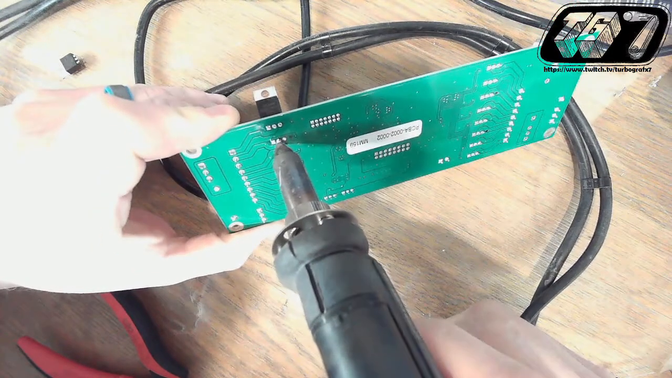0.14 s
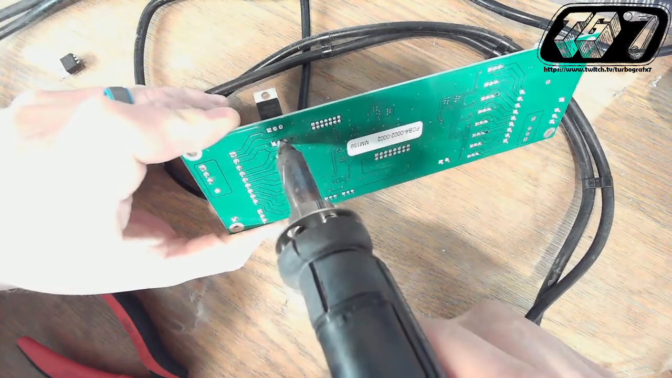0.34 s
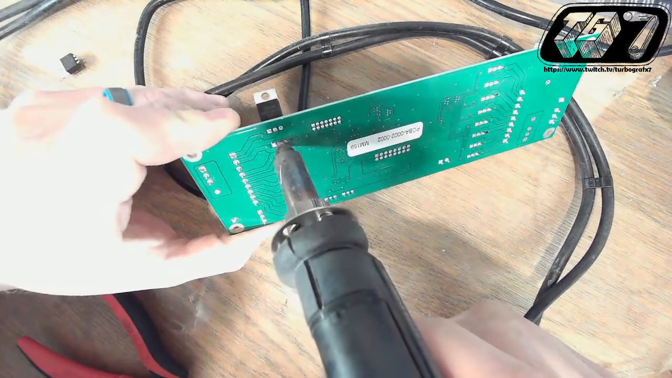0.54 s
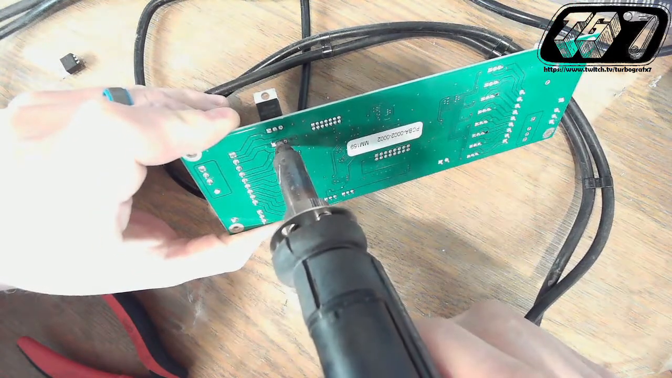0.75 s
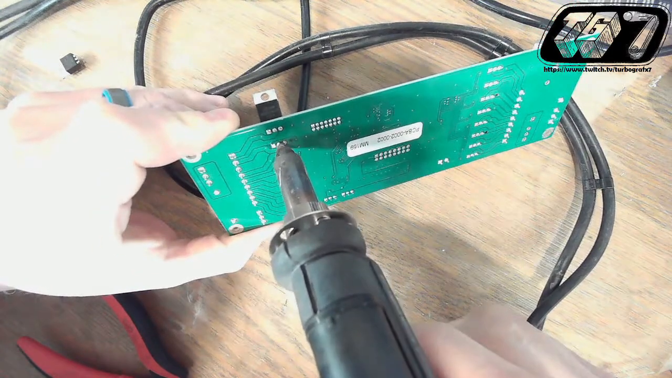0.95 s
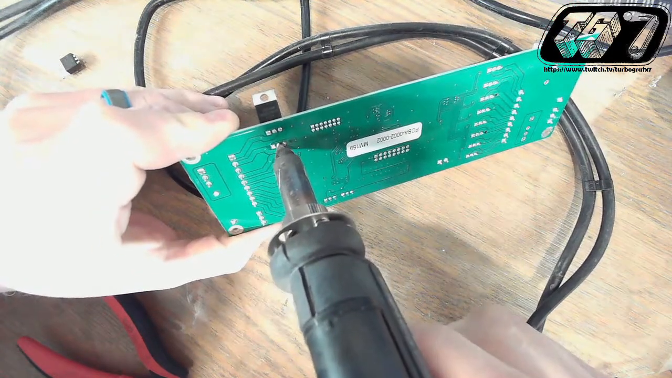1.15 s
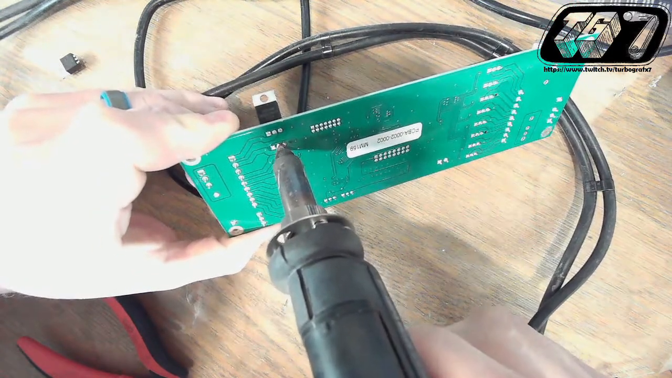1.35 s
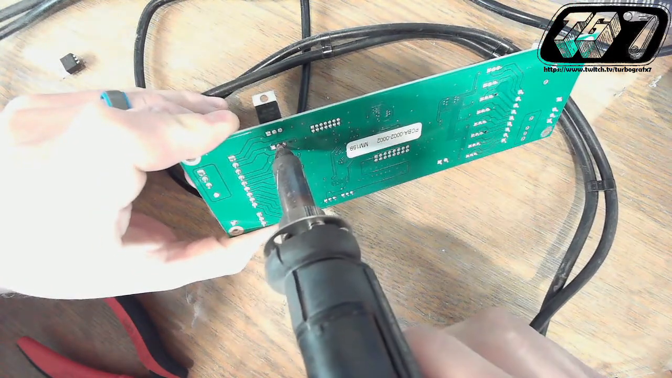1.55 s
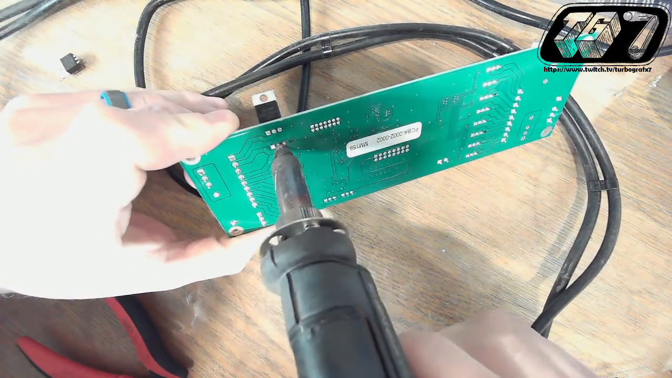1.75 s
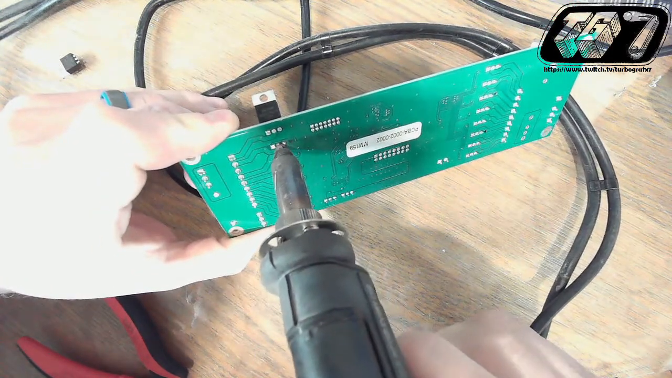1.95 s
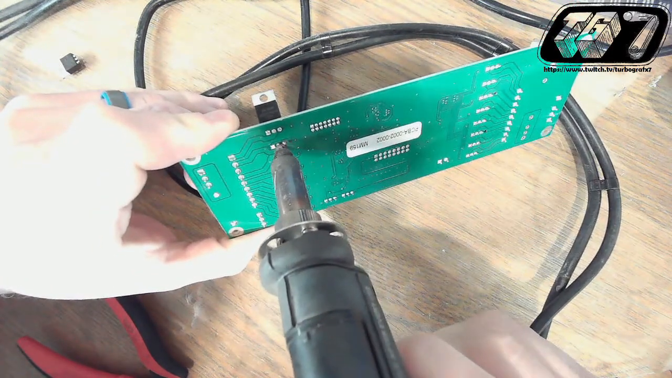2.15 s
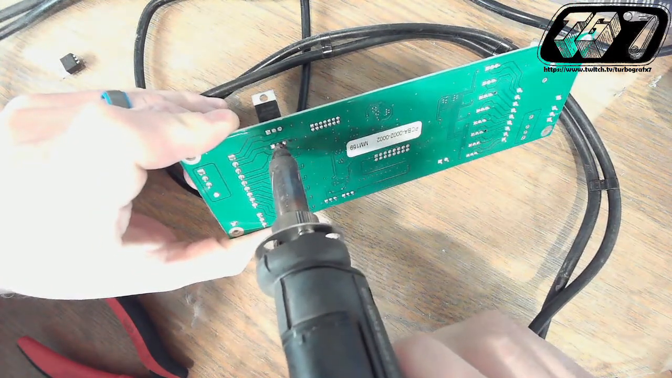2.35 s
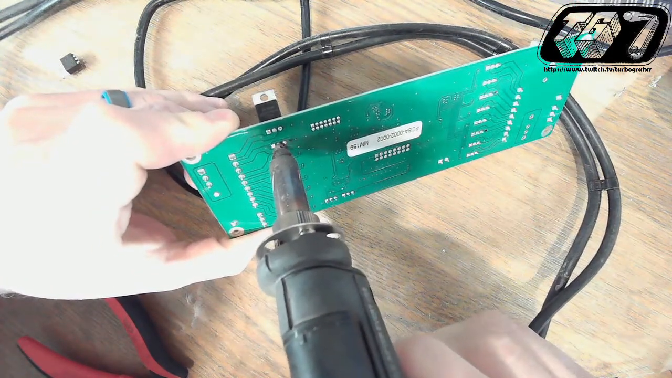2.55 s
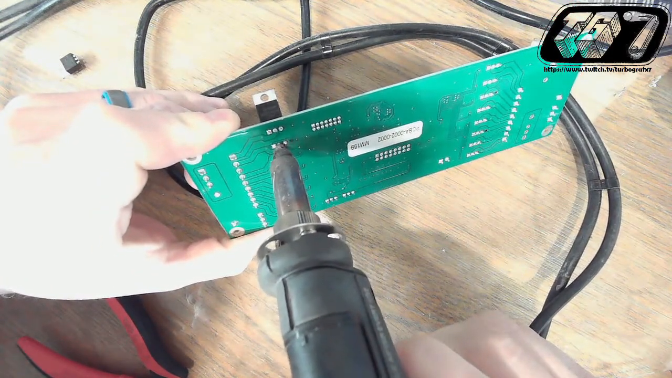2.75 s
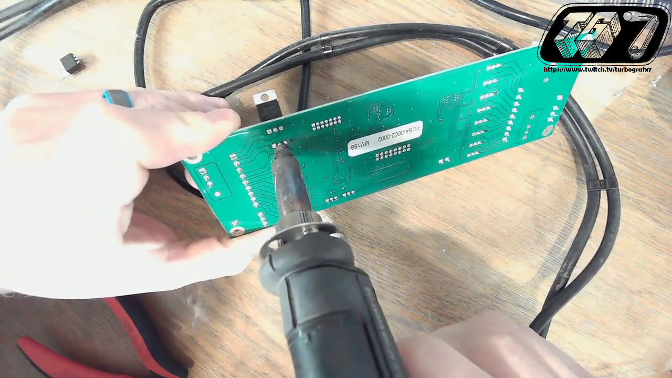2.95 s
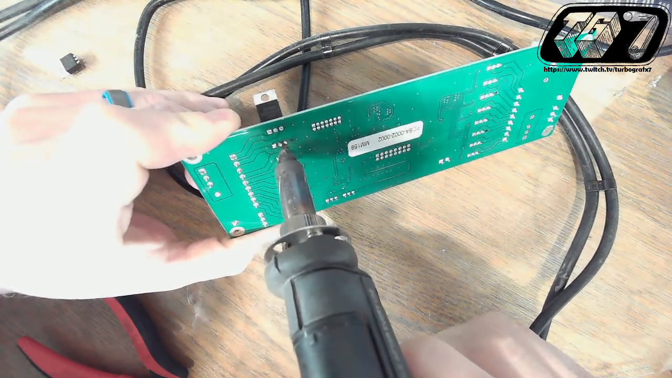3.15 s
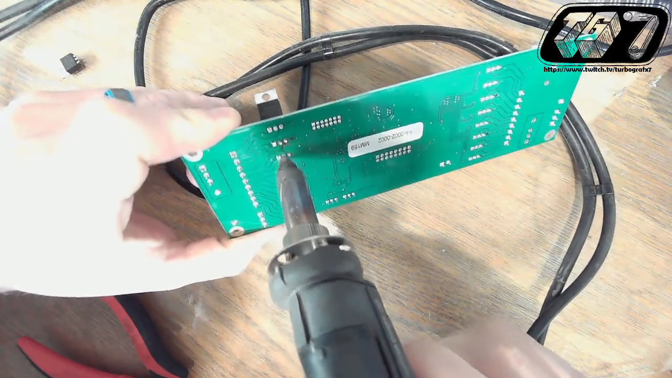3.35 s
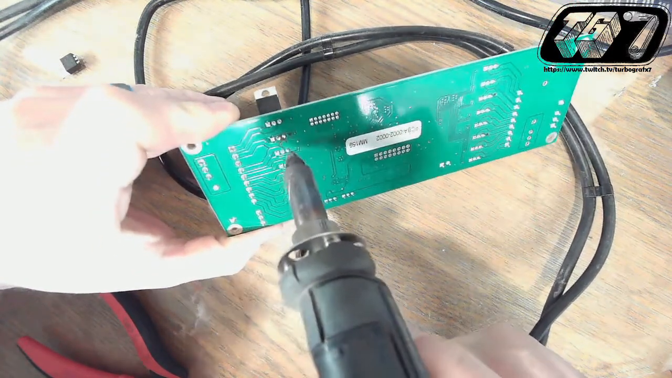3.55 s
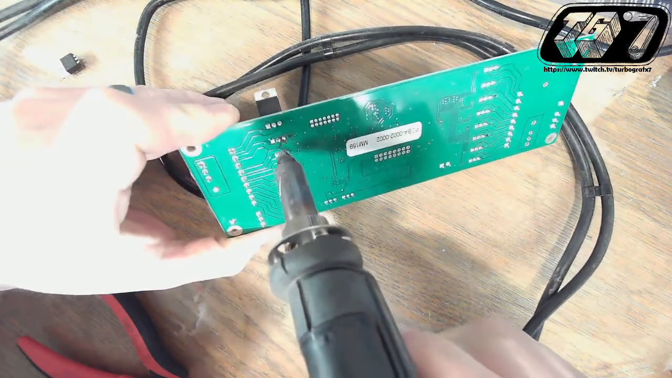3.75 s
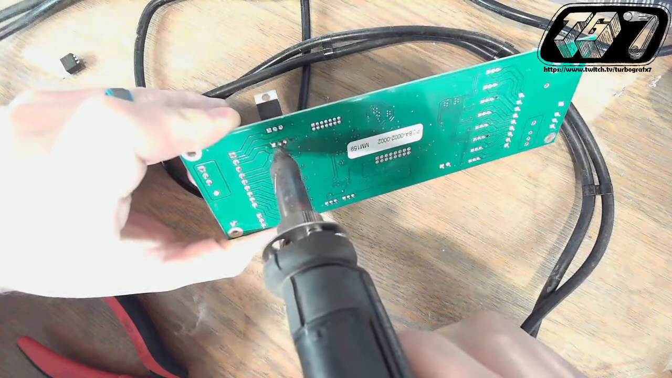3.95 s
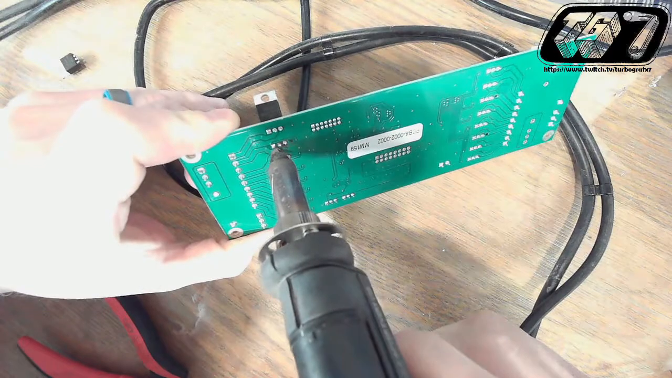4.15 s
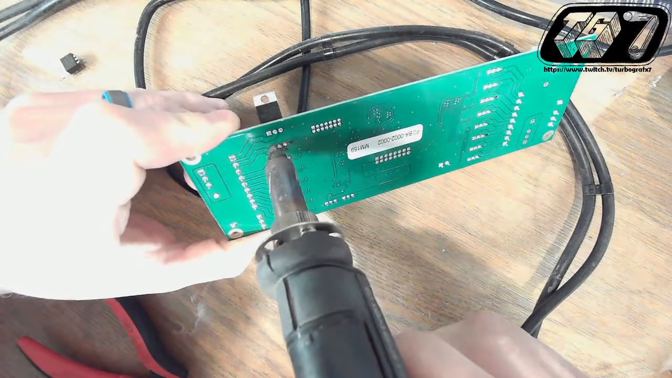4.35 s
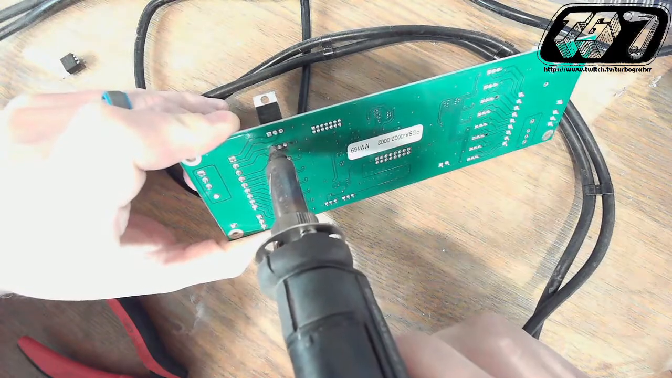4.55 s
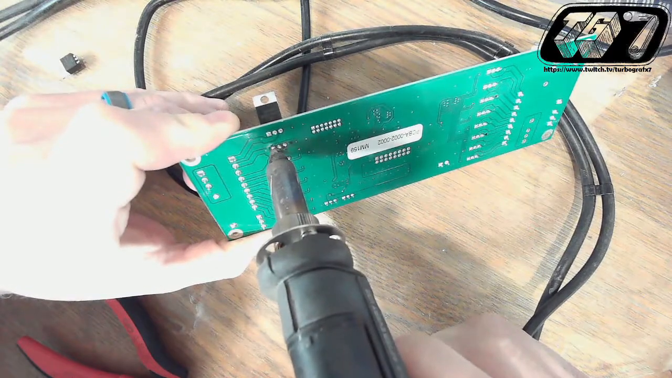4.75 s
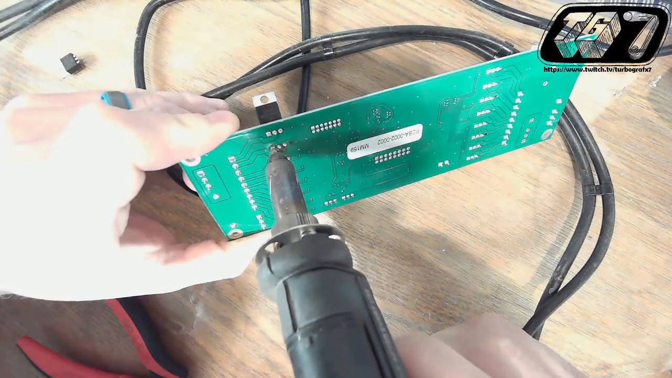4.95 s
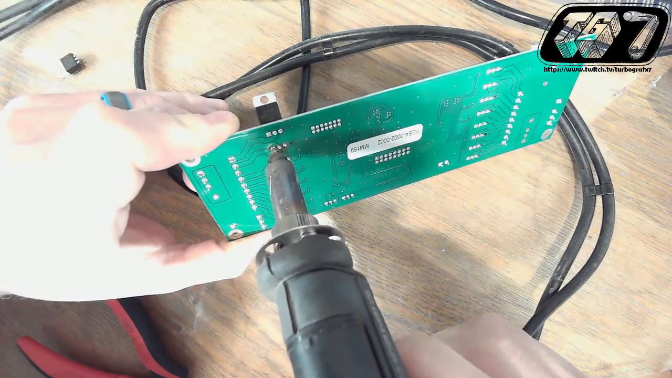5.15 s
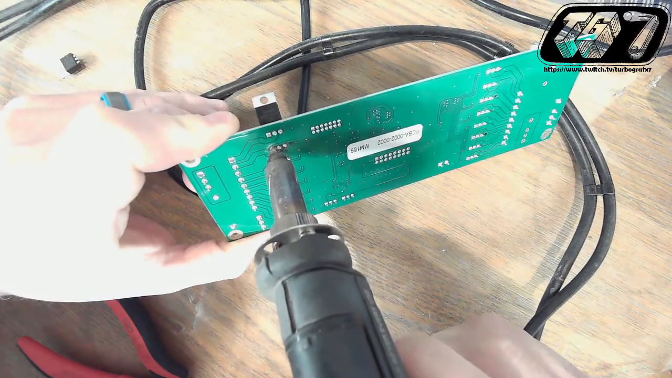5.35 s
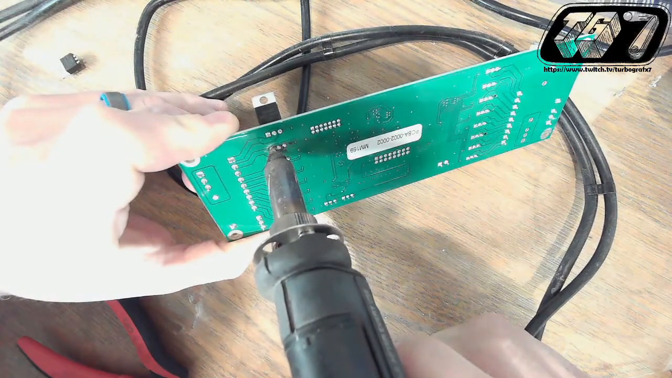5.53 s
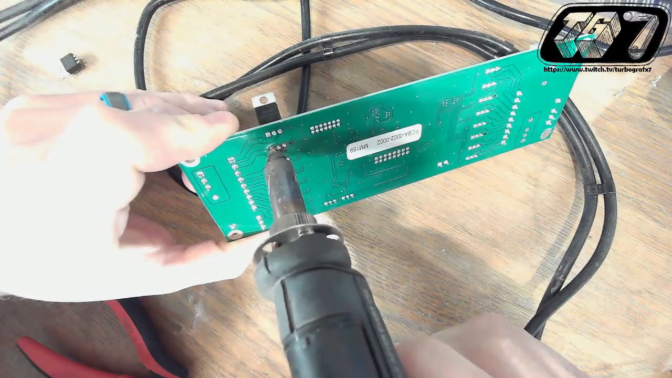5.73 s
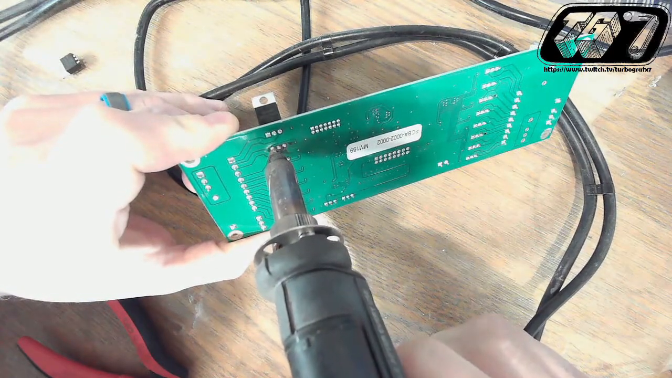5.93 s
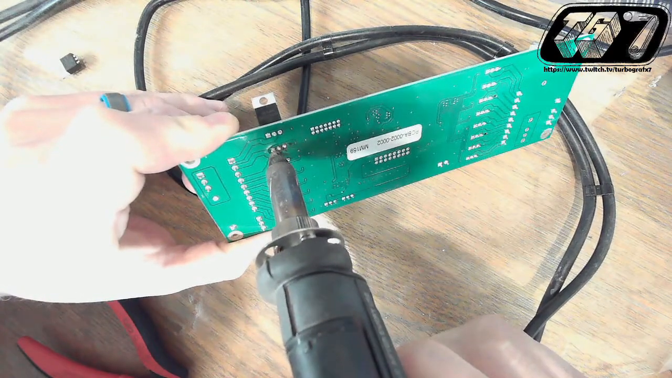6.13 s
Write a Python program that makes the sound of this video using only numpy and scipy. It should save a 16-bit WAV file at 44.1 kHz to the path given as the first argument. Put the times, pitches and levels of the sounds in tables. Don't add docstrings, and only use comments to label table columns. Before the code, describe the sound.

A desoldering gun's trigger snaps, its small pump buzzes for over a second, snaps off, then after a quiet gap buzzes again.

```python
import sys
import numpy as np
from scipy import signal
from scipy.fft import rfft, irfft, next_fast_len
from scipy.io import wavfile
from scipy.ndimage import uniform_filter1d

SR = 44100
rng = np.random.default_rng(int(sys.argv[2]) if len(sys.argv) > 2 else 0)


def level_to_linear(level):
    exponent = np.asarray(level, float) / 20
    return 10 ** exponent


def bounce(signal):
    frames = np.transpose(np.atleast_2d(signal))
    limited = np.clip(frames, -1, 1)
    pcm = np.round(limited * 32767).astype(np.int16)
    wavfile.write(sys.argv[1], SR, pcm)


N = 277389
SIZE = next_fast_len(N)
BINS = np.fft.rfftfreq(SIZE, 1 / SR)


def evened(x):
    return x / np.sqrt(np.mean(x ** 2) + 1e-20)


def read(points, hz):
    f, value = np.transpose(points)
    return np.interp(np.log(hz + 1), np.log(f + 1), value)


def resonate(x, hz, width):
    return signal.lfilter(*signal.iirpeak(hz, hz / width, SR), x)


def wander(hz):
    pole = np.exp(-2 * np.pi * hz * 256 / SR)
    slow = signal.lfilter([1], [1, -pole], rng.standard_normal(N // 256 + 2))
    return np.interp(np.arange(N) / 256, np.arange(len(slow)), evened(slow))


def coloured(x, gain):
    return irfft(rfft(x, SIZE) * gain, SIZE)[..., :N]


def stereo(x, same, lean):
    scatter = rfft(rng.standard_normal(200) * np.exp(-np.arange(200) / 40), SIZE)
    turn = 0.58 * np.arccos(np.clip(read(same, BINS), 0, 1)) * np.cos(np.angle(scatter))
    half = level_to_linear(read(lean, BINS) / 2) * np.exp(1j * turn)
    return coloured(x, np.array([half, 1 / half]))


# frequency in Hz, likeness from 0 to 1.
PUMP_LIKENESS = [(60, 1), (150, 0.94), (380, 1), (950, 0.95), (2380, 0.72), (5980, 0.1), (15000, 0.99)]
# frequency in Hz, left minus right in dB.
PUMP_BALANCE = [(60, -1), (150, -2), (380, 0.5), (950, -2.5), (2380, -2), (5980, -1), (15000, 10.5)]


def pump():
    speed, share, coasting = shaft_motion()
    turns = np.cumsum(speed * (1 + .0006 * wander(hz=15))) / SR
    turns = turns + sum(slip * (np.arange(N) > rest * SR) for rest, off, full, slip in RUNS)
    thrum_gain, rumble_gain, air_gain = (effort(layer, share, coasting) for layer in (THRUM, SHUDDER, SUCTION))
    thrum, whirr = shaft_tones(turns)
    body = thrum_gain * thrum + rumble_gain * (level_to_linear(2.5) * whirr + level_to_linear(-1.5) * housing_rumble(turns))
    body = body + bench_drone(thrum_gain * np.maximum(share ** 1.5, coasting)) + jolts()
    knock, clack = valves(turns)
    high = air_gain * (level_to_linear(-4.5) * knock + level_to_linear(-9.0) * clack + nozzle_air(turns))
    high = coloured(high, 1 / (1 + (BINS / 14800) ** 8) * (BINS > 600))
    return stereo(body + high, PUMP_LIKENESS, PUMP_BALANCE)


# shaft at rest until in seconds, power off in seconds, full speed in turns per second,
# crank slip in turns.
RUNS = [
    (2.0, 3.345, 51.24, .26),
    (5.5, 7.0, 51.18, .12),
]
CONTACT_S, SPIN_UP_S, GRIP_S = .046, .257, .02
COAST_PER_S2, STALL = 306, .3


def shaft_motion():
    t = np.arange(N) / SR
    speed, share, coasting = np.full(N, 14.), np.zeros(N), np.zeros(N)
    for rest, off, full, slip in RUNS:
        climb = np.sin(np.pi / 2 * np.clip((t - rest) / SPIN_UP_S, 0, 1))
        part = climb - np.maximum(t - off, 0) * COAST_PER_S2 / full
        on = (t > rest + CONTACT_S) & (part > np.minimum(STALL, climb / 2))
        bite = np.clip((t - rest - CONTACT_S) / GRIP_S, 0, 1)
        speed = np.where(on, part * full, speed)
        share = np.where(on, part * bite, share)
        coasting = coasting + on * (t > off)
    return uniform_filter1d(speed, size=200), share, coasting


# full-speed level in dB,
# power of speed while driven, power of speed while coasting.
THRUM = (-38, 1.17, 3)
SHUDDER = (-40, 1, 2.8)
SUCTION = (-45, 1.6, 4.1)


def effort(layer, share, coasting):
    full_db, driven, loose = layer
    return uniform_filter1d(level_to_linear(full_db) * share ** (driven + (loose - driven) * coasting), size=200)


# multiple of the shaft speed, level in dB.
SHAFT = [(1, -0.5), (2, -8.5), (3, -10), (4, 0.5), (5, -17.5), (6, -18), (7, -18), (8, -19.5), (9, -23.5),
         (10, -9), (11, -8.5), (12, -28), (13, -6.5), (14, -9.5), (15, -32.5), (16, -25), (17, -8),
         (18, -19), (19, -11), (20, -16.5), (21, -18.5), (22, -18.5), (23, -18.5), (24, -40), (25, -27),
         (26, -17.5)]
# frequency in Hz, density in dB per Hz.
RUMBLE = [(28, -50.5), (48, -20.5), (80, 0), (130, -5.5), (180, 1.5), (240, -9), (300, -6), (430, -18.5),
          (520, -12), (680, -7), (800, -15), (980, -10.5), (1440, -21.5), (3500, -63.5)]


def shaft_tones(turns):
    tones = []
    for k, db in SHAFT:
        tones.append(level_to_linear(db + 0.27 * wander(hz=19)) * np.cos(2 * np.pi * (round(k) * turns + rng.random())))
    drive = sum(tone / level_to_linear(read(RUMBLE, k * 53.8)) for (k, db), tone in zip(SHAFT[4:], tones[4:]))
    return evened(sum(tones[:4])), evened(coloured(drive, level_to_linear(read(RUMBLE, BINS))))


def housing_rumble(turns):
    beat = 1 + .5 * np.cos(4 * np.pi * turns)
    return evened(coloured(beat * rng.standard_normal(N), level_to_linear(read(RUMBLE, BINS))))


# frequency in Hz, level in dB, t60 in seconds.
BENCH = [(54.5, -7, 0.34), (97, -4.5, 0.2), (140.4, -6, 0.36), (172.9, -2, 1.3), (187.7, -2.5, 1.2),
         (212.4, -4, .45), (263, -8, 1.1), (282.3, -2, 0.59), (313, -18.5, 0.82)]


def bench_drone(force):
    low = BINS / (BINS + 60) / (1 + (BINS / 330) ** 4)
    shake = force * level_to_linear(-9.5) * coloured(rng.standard_normal(N), low)
    return sum(level_to_linear(db) * resonate(shake, hz, 2.0 / t60) * np.sqrt(t60 * SR / 7) for hz, db, t60 in BENCH)


# start in seconds, bench peak in dB, housing peak in dB.
JOLTS = [
    (2.059, -62, -43.5),
    (2.0785, -65, -33),
    (2.097, -68, -42),
    (2.109, -62.5, -37),
    (3.369, -51.5, -45),
    (3.392, -54.5, -45),
    (3.41, -52, -53.5),
    (5.571, -64, -37.5),
    (5.593, -63, -34),
]
# frequency in Hz, level in dB, t60 in seconds.
HOUSING = [(606, -6.5, 0.05), (657, -3.5, 0.041), (966, -3, .03), (2790, -9, 0.029)]


def jolts():
    t, out = np.arange(SR) / SR, np.zeros(N + SR)
    for s, *levels_db in JOLTS:
        for db, modes in zip(levels_db, (BENCH, HOUSING)):
            ring = 0
            for hz, mode_db, t60 in modes:
                decay = level_to_linear(mode_db - 60 * t / t60)
                ring = ring + decay * np.sin(2 * np.pi * hz * t) * rng.choice([-1, 1])
            out[round(s * SR):][:SR] += level_to_linear(db) * ring * np.minimum(t / 0.002, 1)
    return out[:N]


# part of a turn, cup level in dB, snap level in dB.
VALVES = [(0, 0.5, 4.5), (0.221, -10.5, -14.5), (0.579, -3, -26.5), (.78, -9, -5.5)]
# frequency in Hz, width in Hz, level in dB.
CUP = [(2750, 99, -1), (2777, 28, 2.5), (2804, 310, -5), (3393, 69.7, 1)]
# frequency in Hz, width in Hz, level in dB.
SHELL = [(3435, 61, -3), (3800, 330, -3.5), (4400, 200, -2.5), (6000, 810, -4), (6600, 320, -2.5),
         (7360, 930, -4.5), (9890, 118, -6.5)]


def valves(turns):
    cup, snap = np.zeros((2, N))
    for part, cup_db, snap_db in VALVES:
        at = np.flatnonzero(np.diff(np.floor(turns - part)))
        blow = np.clip(rng.standard_normal((len(at), 3)), -2.5, 1.5)
        jitter = np.round(.000055 * SR * blow[:, 2]).astype(int)
        at = np.clip(at + jitter, 0, N - 1)
        cup[at] += level_to_linear(cup_db + 3.3 * blow[:, 0])
        snap[at] += level_to_linear(snap_db + 3.7 * blow[:, 1])
    slap = rng.standard_normal(N) * signal.oaconvolve(snap, np.exp(-np.arange(300) / 30))[:N]
    knock = sum(level_to_linear(db) * resonate(resonate(cup, hz, w), hz, 610) for hz, w, db in CUP)
    clack = sum(level_to_linear(db) * resonate(resonate(slap, hz, 1.6 * w), hz, 1.6 * w) for hz, w, db in SHELL)
    return evened(knock), evened(clack)


# frequency in Hz, density in dB per Hz.
AIR = [(710, -28.5), (1200, -11.5), (1440, -7), (1800, -2.5), (2140, -9), (2540, -9.5), (2740, -10.5),
       (3110, -6.5), (3430, -8), (4020, -12), (4530, -2), (7480, -10.5), (10200, -15.5), (14100, -33),
       (15500, -69)]


def nozzle_air(turns):
    puff = 1 + 0.31 * np.exp(-(turns % 1) / 0.7)
    air = coloured(puff * level_to_linear(2. * wander(hz=25.06)) * rng.standard_normal(N), level_to_linear(read(AIR, BINS)))
    return evened(air + sum(level_to_linear(db - 4.5) * resonate(air, hz, w) for hz, w, db in SHELL))


# start in seconds, peak level in dB, left minus right in dB, kind.
SNAPS = [
    (1.43, -65, -17, "tick"),
    (1.8729, -36.5, -2, "creak"),
    (2.038, -12.5, 0.5, "press"),
    (3.348, -8, -0.5, "release"),
    (4.263, -54.5, 3, "tick"),
    (5.538, -12.5, 2.5, "press"),
]
# rise in seconds, length in seconds.
RATTLE = dict(tick=(.0003, .0018), creak=(.0003, .003), press=(0.00071, .0032), release=(0.00211, 0.0056))
# frequency in Hz, level in dB, t60 in seconds.
PRESS = [(685, -21.5, 0.0066), (1990, -24.5, 0.002), (2620, -8.5, 0.012), (3860, 1.5, 0.01),
         (4450, -3.5, 0.048), (5410, -4.5, 0.005), (5900, 5, 0.013), (6700, 6.5, 0.0097),
         (8100, -4.5, 0.0037), (9450, -3, 0.00613), (10680, -13, 0.0054), (12550, -24, 0.0048),
         (14900, -29.5, 0.0017)]
RELEASE = [(1887, -21.5, 0.0076), (2515, -14.5, 0.016), (3670, -9, 0.0081), (4090, -18.5, 0.0071),
           (6060, 2, 0.0048), (6800, -4.5, 0.0073), (8650, -13, 0.0041), (10330, -16.5, 0.0031),
           (11840, -22.5, 0.0041), (13900, -32.5, .002)]
CREAK = [(2170, -7, 0.0031), (3300, -1.5, .008), (5000, -8, 0.0066), (5700, 3, 0.0053), (6750, -7, 0.0049),
         (8000, -17, 0.0066), (10600, -13, 0.01)]
TICK = [(4600, -4, .004), (6000, 1, 0.0024), (7500, -2, .004), (9250, -3, .004), (11800, -13, .004)]


def trigger():
    t, out = np.arange(3000) / SR, np.zeros((2, N + 3000))
    modes = dict(press=PRESS, release=RELEASE, creak=CREAK, tick=TICK)
    for s, db, lean_db, kind in SNAPS:
        rise, length = RATTLE[kind]
        rattle = (t < length) * np.minimum(t / rise, 1) ** 2 * np.exp(-np.maximum(t - rise, 0) / 0.0019)
        fizz = level_to_linear(-25.5) * np.exp(-t / 0.0085)
        snap = 0
        for hz, mode_db, t60 in modes[kind]:
            shared, left, right = rng.standard_normal((3, len(t)))
            noise = np.clip(3000 / hz, 0, 4) * shared + np.array([left, right])
            kicks = (rattle + fizz / (1 + (hz / 9000) ** 4)) * noise
            mode = level_to_linear(-60 * t / t60) * np.sin(2 * np.pi * hz * t)
            ring = signal.fftconvolve(kicks, mode[None], axes=1)[:, :len(t)]
            ring = resonate(ring, hz, hz / 5)
            snap = snap + level_to_linear(mode_db) * ring / np.linalg.norm(ring, axis=1, keepdims=True) / np.sqrt(t60)
        snap /= np.sqrt(np.mean(snap[:, :200] ** 2)) * 2.31
        out[:, round(s * SR):][:, :len(t)] += level_to_linear(db + np.array([[.5], [-.5]]) * lean_db) * snap
    return out[:, :N]


def walls(x):
    t = np.arange(SR // 2) / SR
    near, far = rng.standard_normal((2, 2, len(t))) * (t > .004)
    far = signal.sosfilt(signal.butter(2, 700, fs=SR, output="sos"), far[0] + .3 * far)
    near = signal.sosfilt(signal.butter(2, [600, 9000], "band", fs=SR, output="sos"), near)
    tail = near * level_to_linear(-60 * t / 0.12) + far * level_to_linear(-6.5 - 60 * t / 0.55)
    return signal.fftconvolve(x, tail / np.linalg.norm(tail[0]), axes=1)[:, :N]


# frequency in Hz, density in dB per Hz.
ROOM = [(60, -5.5), (150, -0.5), (250, 1), (450, -7.5), (700, -4), (1150, -3.5), (1500, -7.5), (2200, -6.5),
        (3100, -7.5), (4500, -8), (7000, -13), (9000, -21.5), (12000, -31), (15400, -34.5)]
# frequency in Hz, width in Hz, lift in dB.
DUCT = [(885, 88, 8), (1864, 260, 11), (2620, 180, 8.5), (5630, 690, 5)]
# frequency in Hz, density in dB per Hz.
HEAVE = [(5, -3), (18, 3), (30, -5.5), (48, 0), (70, -14), (100, -13), (160, -26), (300, -58.5)]
# frequency in Hz, level in dB.
TONES = [(120, -65.5), (204.6, -82), (272.8, -92), (362, -86), (409, -92), (545, -91.5), (682, -80.5),
         (750.5, -82.5), (947, -80.5), (1090, -84), (2183, -84.5)]
# frequency in Hz, likeness from 0 to 1.
ROOM_LIKENESS = [(60, 0.41), (150, 0.77), (380, 0.65), (950, 0.68), (2380, 0.48), (5980, 0.078), (15000, 1)]
# frequency in Hz, left minus right in dB.
ROOM_BALANCE = [(60, -4), (150, 2.5), (380, -2), (950, -2.0), (2380, -1.9), (5980, -1.5), (15000, 6)]
ROOM_DB, HEAVE_DB = -64.5, -60


def room():
    t = np.arange(N) / SR
    lift_db = sum(db / (1 + ((BINS - f) / w * 2) ** 2) for f, w, db in DUCT)
    fan = level_to_linear(read(ROOM, BINS) + lift_db)
    level = level_to_linear(ROOM_DB) * fan / np.sqrt(np.mean(fan ** 2))
    bass = rng.standard_normal((2, N)) + 0.94 * rng.standard_normal(N)
    bumps = level_to_linear(HEAVE_DB + 3.1 * wander(hz=2.1)) * evened(coloured(bass, level_to_linear(read(HEAVE, BINS))))
    a, b = rng.standard_normal((2, N))
    same = np.clip(read(ROOM_LIKENESS, BINS), 0, 1)
    lean = level_to_linear(read(ROOM_BALANCE, BINS) / 2)
    right = coloured(a, level * same / lean) + coloured(b, level * np.sqrt(1 - same ** 2) / lean)
    noise = np.array([coloured(a, level * lean), right])
    tones = 0
    for f, db in TONES:
        sine = np.sqrt(2) * np.sin(2 * np.pi * (f * t + rng.random()))
        tones = tones + level_to_linear(db + 1.2 * wander(hz=3.3)) * sine
    return noise + bumps + tones * level_to_linear([[-.7], [.7]])


def scene():
    gun = pump() + trigger()
    high = signal.sosfilt(signal.butter(2, 330, "high", fs=SR, output="sos"), gun)
    return gun + level_to_linear(-18.5) * walls(high) + room()


def low_pass(x):
    return signal.sosfilt(signal.butter(12, 16510, fs=SR, output="sos"), x)


OFFSET = [
    [-.005],
    [-.0007],
]
EDGE_HZ, DROPOUT_HZ = 15750, 14500


def record(dry):
    edged = coloured(dry, level_to_linear(-30 * np.clip((BINS - EDGE_HZ) / 150, 0, 1)))
    bass = coloured(dry[0], (BINS > 40) & (BINS < 1000))
    bass_db = 10 * np.log10(uniform_filter1d(bass ** 2, size=2000) + 1e-12)
    top = coloured(edged, np.clip((BINS - DROPOUT_HZ) / 300, 0, 1))
    faint = uniform_filter1d(top[0] ** 2, size=300) < level_to_linear(-150)
    starved = (bass_db > -47) & faint & (wander(hz=8) < 1.4)
    edged = edged - top * uniform_filter1d(starved * 1., size=400)
    held = coloured(np.clip(edged, -.3, .3), level_to_linear(-60 * np.clip((BINS - EDGE_HZ - 200) / 900, 0, 1)))
    return low_pass(held + np.array(OFFSET))


dry = scene()
out = record(dry)
bounce(out)
```